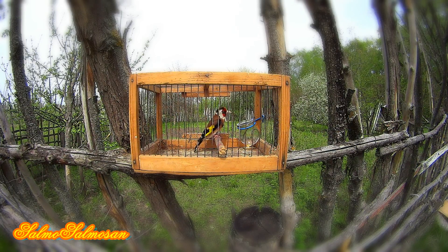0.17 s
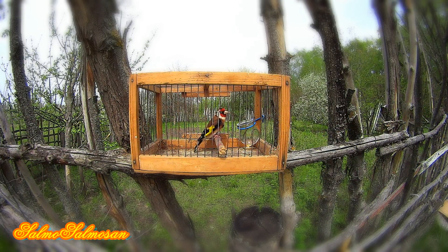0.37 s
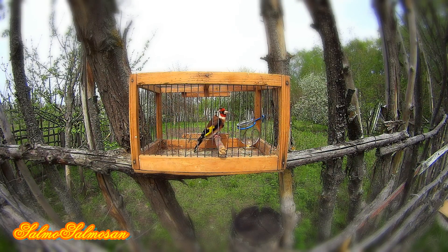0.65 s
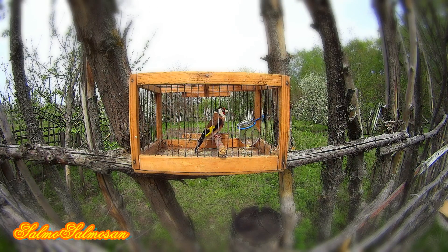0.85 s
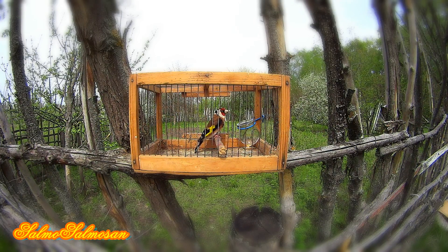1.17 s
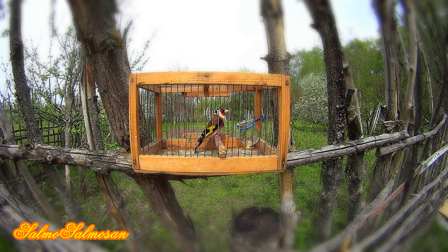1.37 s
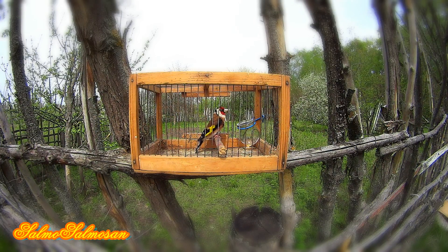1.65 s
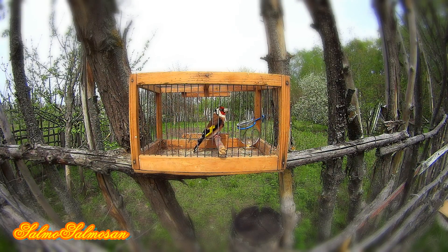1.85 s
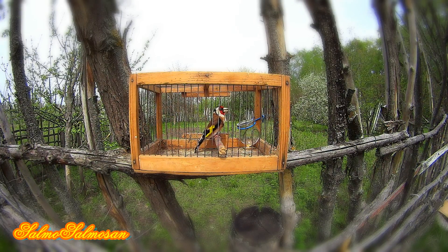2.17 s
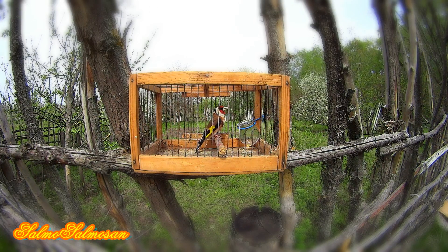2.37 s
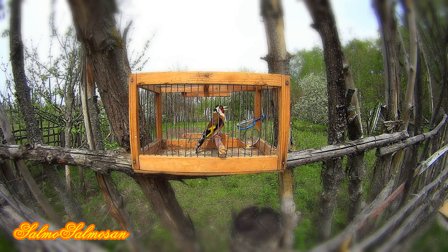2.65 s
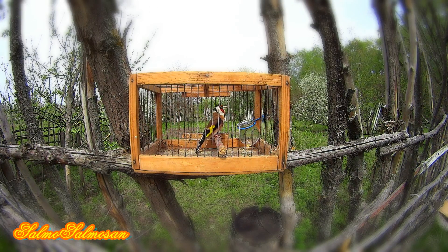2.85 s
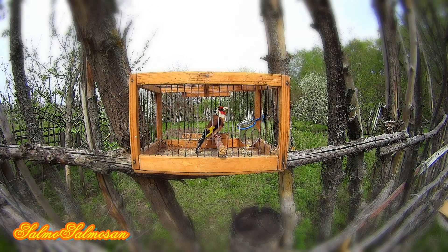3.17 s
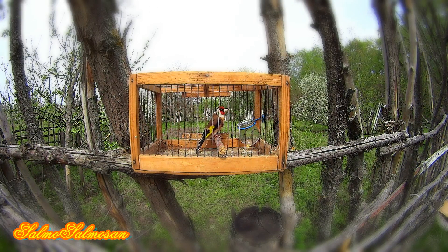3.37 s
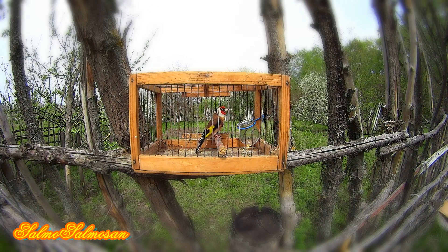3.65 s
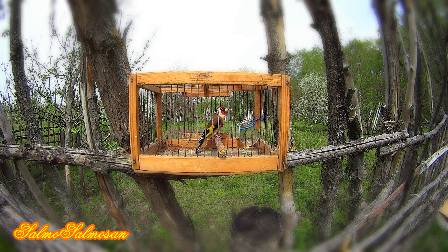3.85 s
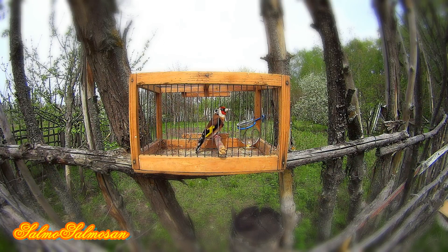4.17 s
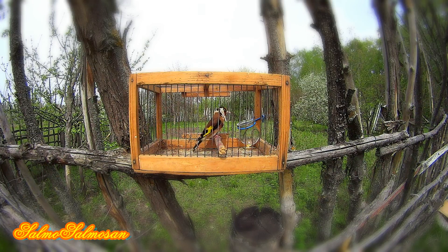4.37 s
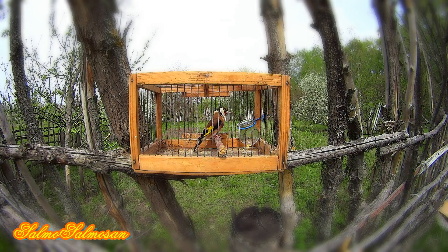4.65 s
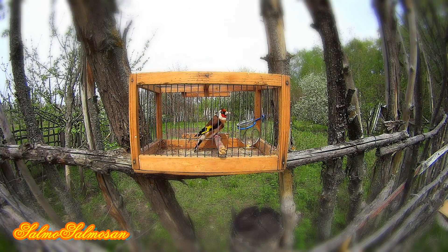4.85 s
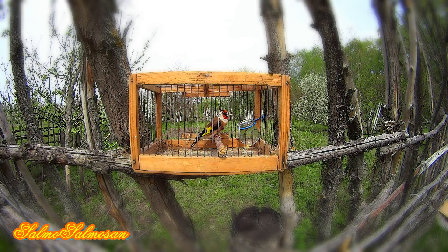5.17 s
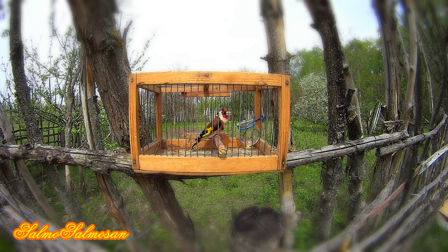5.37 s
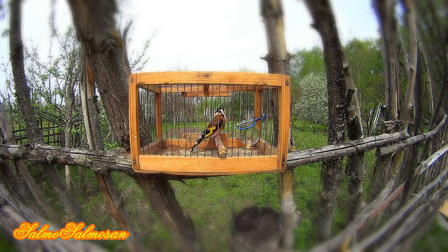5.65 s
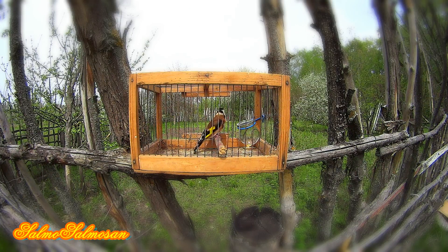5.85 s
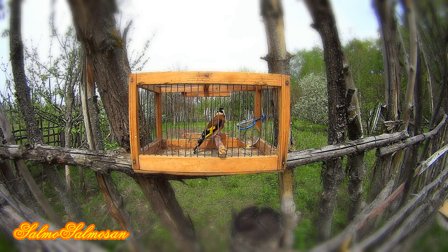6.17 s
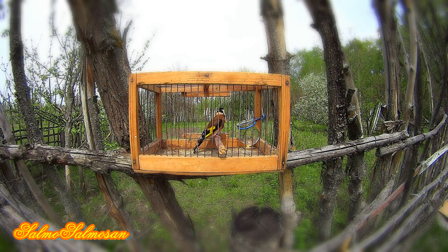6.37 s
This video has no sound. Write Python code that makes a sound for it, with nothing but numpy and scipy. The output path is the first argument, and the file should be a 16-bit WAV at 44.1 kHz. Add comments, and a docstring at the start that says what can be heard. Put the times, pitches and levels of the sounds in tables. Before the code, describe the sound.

In a quiet garden, a small caged goldfinch sings close to a stereo microphone. After a soft rushing pause come quick chirps, ringing high pings, a rising and falling raspy wheeze, then a dense rattling twitter. Another pause holds one barely audible far bird call, before a shorter second phrase of whipping notes, pings and a final wheeze. Foliage returns only a faint echo.

```python
"""A quiet garden: close to a stereo microphone, a goldfinch sings two twittering phrases.
Two sides of its voice organ (syrinx) whistle separately, mix into extra tones and turn raspy in the wheezes.
Trees return a faint echo, made by convolving the song with shaped noise.
Filtered noise makes a distant outdoor rush and a faint hum; a short noise band is another bird's far call."""
import sys
import numpy as np
from scipy import signal
from scipy.fft import rfft, irfft
from scipy.io import wavfile
from scipy.ndimage import uniform_filter1d

SR = 44100
rng = np.random.default_rng(int(sys.argv[2]) if len(sys.argv) > 2 else 0)


def unload_audio(sound):
    """Save the sound as a 16-bit wav file, at the path given as the first command line argument."""
    columns = np.transpose(np.atleast_2d(sound))
    # keep every value between -1 and 1, then stretch to whole-number steps
    steps = np.round(np.clip(columns, -1, 1) * 32767)
    wavfile.write(sys.argv[1], SR, steps.astype(np.int16))


N = 286650
T = np.arange(N) / SR  # time of each sample, seconds
FREQS = np.fft.rfftfreq(N, 1 / SR)  # hertz

# Tone colour of the distant rush, before its loudness is set: (pitch_hz, relative_level_db per Hz)
RUSH_SPECTRUM = [(12, -41.5), (20, -13.5), (64, -1), (131, -7), (162, -10.5), (298, -10.5), (340, -11.5),
                 (506, -9), (980, -8.5), (1280, -14), (1800, -18.5), (1950, -21.5), (3400, -26.5),
                 (10300, -32.5), (11200, -36.5), (14600, -69), (22000, -120)]
# Heard level of the background noise, before gain and flicker are added; it dips during each phrase
# of the song and comes back slowly: (time_s, level_db)
BACKGROUND_LEVEL = [(0, -50), (.7, -47), (1.6, -47.5), (2.1, -49.5), (2.7, -54), (3.6, -51), (4.1, -50),
                    (4.85, -47), (5.3, -52), (5.9, -51.5), (6.4, -48.5)]
# How the rush differs between the two microphone ports:
# (pitch_hz, coherence 0-1, left_lead_radians, left_minus_right_db)
RUSH_PORTS = [(59.17, 1, 0.2496, -0.5), (170, 0.97, .7, 0.5), (350, 0.64, 1.25, 0.2), (702, .82, 1.55, 2),
              (1400, 0.37, 1.7, 2), (3100, 0.64, 2.07, 3.1), (7100, 0.303, 1.4, -0.4)]
# The throat cannot tune down to the lowest notes and passes their overtones instead. Levels are relative
# to the main tone: (pitch_hz, second_harmonic_db, third_harmonic_db, fourth_harmonic_db)
OVERTONES = [(1600, 4.5, 6.5, -9), (2150, 11.5, -5, -5), (2740, -6, -28, -19.5), (2900, -17.5, -20, -35.5),
             (3480, -24, -26.5, -47.5), (4070, -33.5, -27, -50), (5168, -26, -26.5, -50),
             (5600, -46, -40, -49), (6840, -54, -50, -50)]
# What the throat and open beak let through of the mixed tones and the air: (pitch_hz, level_db)
THROAT = [(500, -61), (1300, -24), (2300, -9.5), (3400, 0.5), (6300, 0), (8500, -5), (10600, 2),
          (12300, -22), (15800, -17)]
# Each named syllable is a few strokes by the left or right side; the song rescales them:
# (side, delay_s, length_s, from_hz, to_hz, glide_s, glide_hesitation power, level_db,
#  attack_s, release_s, roughness 0-1)
SYLLABLES = { "tip": [("L", 0, .031, 1500, 2650, .009, 2.5, -20, .021, .011, .1)],
             "pip": [("L", 0, .029, 2380, 2770, .008, 2, -17, .017, .013, .08)],
             "twee": [("L", 0, .038, 2940, 3920, .014, 2.1, -4, .022, .014, .08),
             ("R", .028, .041, 2800, 5600, .0105, 1.6, -4.9, .014, .021, .08),
             ("L", .038, .031, 4450, 4830, .008, 1.1, -15, .02, .009, .08)],
             "chirp": [("L", 0, .022, 2650, 3000, .021, 4, -22, .015, .004, .55),
             ("R", .004, .04, 2950, 3500, .03, 2, -25, .02, .01, .15),
             ("L", .016, .034, 2950, 3360, .013, 1.4, -6.5, .019, .016, .08)],
             "churr": [("L", 0, .02, 2540, 3100, .018, 2.5, -20, .017, .003, .45),
             ("R", .014, .034, 3000, 4020, .013, 1.7, -7.8, .017, .01, .08),
             ("L", .018, .03, 2900, 3740, .011, 1.4, -11.5, .009, .009, .08)],
             "swee": [("R", .001, .011, 2900, 4250, .0045, 2, -6, .007, .003, .1),
             ("R", .007, .039, 4230, 5400, .029, 1.4, -6.7, .004, .007, .08),
             ("L", .012, .036, 4350, 5100, .018, 1.5, -17, .02, .005, .08),
             ("R", .043, .051, 5170, 5820, .033, 1.3, -6, .009, .013, .08),
             ("L", .048, .042, 5020, 4860, .008, 1.5, -16.5, .006, .012, .08)],
             "tsee": [("R", 0, .008, 5600, 5000, .004, 2, -8, .003, .002, .08),
             ("R", .006, .006, 5000, 8400, .0035, 1.5, -5.5, .002, .003, .08),
             ("L", .006, .058, 5050, 4150, .025, 1.4, -18.5, .015, .018, .13),
             ("R", .009, .021, 8000, 8720, .003, 1.5, -15, .005, .013, .25),
             ("R", .022, .046, 8550, 6880, .019, 1.6, -5, .03, .016, .08)],
             "chirrup": [("R", 0, .017, 3500, 5200, .007, 2, -9, .012, .003, .2),
             ("L", .001, .017, 3100, 4350, .008, 2, -11.5, .011, .004, .25),
             ("R", .014, .008, 4800, 3400, .004, 1.5, -5, .002, .002, .2),
             ("R", .021, .008, 4400, 3300, .004, 2, -5.5, .002, .003, .2),
             ("R", .027, .007, 3200, 4300, .003, 2, -11, .003, .003, .18),
             ("L", .029, .022, 3200, 2790, .005, 1.5, -17, .004, .018, .1)],
             "lift": [("L", 0, .016, 3650, 4620, .008, 1.6, -7.5, .009, .003, .1)],
             "whip": [("R", 0, .007, 4700, 8500, .004, 1.7, -5.5, .003, .003, .08),
             ("R", .005, .01, 8000, 8520, .002, 1.2, -17.5, .002, .008, .08)],
             "slide": [("L", 0, .07, 3340, 4400, .037, 1.6, -5.6, .024, .058, .08),
             ("R", .025, .046, 3950, 4580, .018, 1.4, -7, .01, .011, .08)], }
# The order of the song: (start_s, syllable name, time_stretch ratio, pitch ratio, gain_db)
SONG = [ (1.622, "tip", 1.01, 1.001, -1), (1.702, "twee", 1.01, 1.002, 0), (1.801, "chirp", 1.01, .998, 0),
        (2.475, "churr", 1.01, .998, 0), (2.546, "pip", 1.01, .998, 0), (2.596, "swee", 1.001, .999, 0),
        (2.723, "churr", .97, 1.002, 0), (2.796, "pip", 1.01, 1.005, -1), (2.851, "swee", 1.02, 1.001, 0),
        (2.992, "churr", 1.01, .999, 0), (3.075, "tsee", 1.001, 1.001, 0),
        (3.15, "chirrup", 1.01, 1.001, 0), (3.246, "tsee", .98, .998, 0),
        (3.323, "chirrup", .98, .995, -1.5), (4.896, "tip", .99, 1.002, 2.5),
        (4.974, "twee", 1.01, .995, 0), (5.075, "chirp", .99, 1.002, -1), (5.156, "lift", 1.01, 1.001, -1),
        (5.17, "whip", 1.01, 1.001, 0), (5.207, "slide", 1.001, 1.001, 0), (5.319, "lift", .9, 1.11, 0),
        (5.331, "whip", 1.01, .998, 0), (5.369, "slide", .97, .996, 0), ]
# Ringing pings of two voices, the first with a faint lower third, one row per voice:
# (start_s, side, length_s, pitch_hz, settling_s, level_db, attack_s, release_s)
PINGS = [ (1.897, "L", .045, 6190, .013, -13, .003, .007), (1.902, "R", .039, 7440, .011, -7.6, .004, .009),
         (1.905, "L", .031, 3740, .012, -30, .007, .022), (2.007, "L", .055, 5180, .009, -5.3, .021, .008),
         (2.008, "R", .028, 6370, .004, -10, .004, .018), (5.465, "L", .053, 6755, .006, -7, .004, .008),
         (5.471, "R", .046, 7830, .016, -15, .007, .004), (5.557, "L", .049, 5650, .006, -5.5, .018, .008),
         (5.555, "R", .022, 7050, .006, -7.5, .003, .018), ]
# In each wheeze the right side climbs, then slurs down; all four curves have the same columns,
# with levels before the peak boost and fades: (time_s, pitch_hz, rms_level_db)
FIRST_CLIMB = [(2.117, 4295, -36), (2.125, 4296, -22), (2.149, 4541, -18), (2.175, 5005, -11),
               (2.195, 5297, -14), (2.203, 5581, -19), (2.231, 6874, -17), (2.25, 7261, -17)]
FIRST_SLUR = [(2.268, 6317, -16), (2.312, 5843, -12), (2.346, 5120, -9), (2.358, 4711, -8),
              (2.374, 4124, -10), (2.404, 3358, -11), (2.42, 2753, -23), (2.428, 2731, -37)]
SECOND_CLIMB = [(5.667, 4663, -38), (5.677, 4738, -23), (5.689, 4966, -23), (5.721, 5370, -15),
                (5.751, 5876, -23), (5.771, 6378, -13), (5.783, 6760, -19)]
SECOND_SLUR = [(5.818, 6806, -15), (5.856, 6982, -13), (5.87, 6590, -11), (5.876, 6253, -9),
               (5.92, 4185, -10), (5.94, 3427, -20), (5.952, 2978, -30), (5.958, 2894, -43)]
# Strokes that accompany the wheezes and make them harsh:
# (side, start_s, length_s, from_hz, to_hz, glide_s, glide_hesitation power, level_db,
#  attack_s, release_s, roughness 0-1)
WHEEZE_STROKES = [ ("L", 2.119, .083, 1450, 3000, .078, 1.8, -31, .008, .015, .55),
                  ("L", 2.13, .078, 3050, 5600, .062, 1.7, -20, .03, .02, .55),
                  ("L", 2.198, .038, 3080, 3700, .025, 1.5, -19, .028, .005, .65),
                  ("L", 2.229, .029, 3750, 4600, .022, 1.6, -7.5, .012, .007, .29),
                  ("L", 2.25, .03, 3150, 3430, .008, 2, -9, .014, .014, .29),
                  ("L", 2.29, .072, 4430, 2900, .052, 1.6, -13.5, .007, .03, .08),
                  ("R", 2.305, .047, 8400, 6600, .033, 1.3, -24, .014, .016, .08),
                  ("L", 2.355, .062, 3200, 1700, .042, 1.3, -29, .005, .05, .16),
                  ("L", 5.668, .095, 1500, 3200, .08, 1.2, -31, .01, .04, .7),
                  ("L", 5.674, .08, 3450, 5800, .066, 2.4, -21, .04, .03, .7),
                  ("L", 5.754, .056, 3350, 5400, .033, 1.2, -16, .038, .01, .12),
                  ("L", 5.775, .032, 3265, 3750, .018, 1.3, -20.5, .012, .004, .12),
                  ("R", 5.774, .032, 5300, 6300, .02, 1.4, -20, .01, .016, .12),
                  ("L", 5.802, .024, 3650, 3900, .012, 1.5, -9, .012, .011, .12),
                  ("L", 5.846, .054, 4470, 3000, .045, 2.2, -20, .008, .015, .08),
                  ("L", 5.897, .052, 3350, 1700, .04, 1.5, -31, .005, .006, .21), ]
# The song at the two microphone ports: (pitch_hz, left_lead_radians, left_minus_right_db)
PORTS = [(2800, 0.85, 0), (4042, 0.27, 0.3), (6000, 0.334, -0.9), (9020, 0.27, -1.4), (14000, 1.6, -.7)]
# Scattered echoes off trunks and fence, before their treble is softened: (delay_s, level_db)
ECHOES = [(0.022, -25.5), (.052, -38)]

NOISE_TOP_HZ, TOP_HZ = 11200, 16100  # where the background noise and the whole sound are cut off
GARDEN_T60_S, GARDEN_DB = 0.45, -33.5  # foliage: time to fade by 60 dB, level before treble softening
# The rasp: average flutter rate of the membranes (Hz), and its swings at full roughness:
# regular phase swing (radians), random phase swing (radians rms), swing of strength (share)
FLUTTER_HZ, FLUTTER_SWING, FLUTTER_CHANCE, FLUTTER_DEPTH = 558.5, 1.4, 0.67, 0.68
PING_SHARP = 1.08  # a ping starts sharp by this ratio and settles on its pitch
RAMP_POWER = 1.5  # how softly every stroke opens and closes: power of a quarter sine
WHEEZE_FADE_S, WHEEZE_PEAK_DB = 0.007, 2.2  # fade at each end, peak over rms level


def undb(db):
    """Turn decibels into gain."""
    return 10 ** (np.asarray(db) / 20)


def along(points, hz, axis=1):
    """Read a table column, joined by straight lines over a log-frequency axis."""
    points = np.array(points, float)
    return np.interp(np.log(hz + 1), np.log(points[:, 0] + 1), points[:, axis])


def noise(centre_hz, width_hz):
    """Make a bell-shaped band of noise with an rms of 1; around 0 Hz it is a slow random drift."""
    bell = np.exp(-.5 * ((FREQS - centre_hz) / width_hz) ** 2)
    band = irfft(rfft(rng.standard_normal(N)) * bell, N)
    return band / band.std()


def smooth(x, seconds):
    """Take a running mean: muscles cannot turn sharp corners."""
    return uniform_filter1d(x, max(1, int(seconds * SR)))


def rush(gain_db=3, flicker_db=.5):
    """Distant outdoor noise, partly shared by the ports and arriving mostly from one side."""
    shared, own = rfft(rng.standard_normal((2, N)))
    coherence = np.clip(along(RUSH_PORTS, FREQS, axis=1), 0, 1)
    left = np.sqrt(coherence) * shared + np.sqrt(1 - coherence) * own
    left = left * np.exp(1j * along(RUSH_PORTS, FREQS, axis=2))
    tilt = undb(along(RUSH_PORTS, FREQS, axis=3) / 2)
    colour = undb(along(RUSH_SPECTRUM, FREQS)) * (FREQS < NOISE_TOP_HZ)
    stereo = irfft(np.array([left * tilt, shared / tilt]) * colour, N)
    level_db = np.interp(T, *np.transpose(BACKGROUND_LEVEL)) + gain_db + flicker_db * noise(0, 9.2)
    return stereo / stereo.mean(axis=0).std() * undb(level_db)


def hum(hz=297, width_hz=5, db=-66):
    """A faint distant hum: a noise band so narrow that it wavers like an unsteady tone."""
    return undb(db) * noise(hz, width_hz)


def strokes():
    """List every stroke at its own time: sung syllables, pings and wheeze strokes."""
    sung = []
    for at, name, stretch, ratio, gain_db in SONG:
        for (side, delay, length, start_hz, end_hz, glide, hesitation,
             db, attack, release, rough) in SYLLABLES[name]:
            sung.append((side, at + stretch * delay, stretch * length,
                         ratio * start_hz, ratio * end_hz, stretch * glide, hesitation,
                         db + gain_db, stretch * attack, stretch * release, rough))
    pings = [(side, at, length, PING_SHARP * hz, hz, settling, 1, db, attack, release, 0)
             for at, side, length, hz, settling, db, attack, release in PINGS]
    return sung + pings + WHEEZE_STROKES


def ramps_db(t, attack, release):
    """The air opens, holds and closes over the times t of one note."""
    opening = np.sin(np.pi / 2 * np.clip((t - t[0]) / attack, 0, 1))
    closing = np.sin(np.pi / 2 * np.clip((t[-1] - t) / release, 0, 1))
    return RAMP_POWER * 20 * np.log10(np.maximum(opening * closing, 1e-3))


def stroke(at, length, start_hz, end_hz, glide, hesitation, db, attack, release, size=200):
    """One note as rows (s, Hz, dB): the membrane's tension relaxes towards a new pitch."""
    t = np.linspace(0, length, size)
    hz = end_hz + (start_hz - end_hz) * np.exp(-(t / glide) ** hesitation)
    return np.column_stack([at + t, hz, db + ramps_db(t, attack, release)])


def slur(curve, size=200):
    """One long wheeze note as rows (s, Hz, dB), steered freely in pitch and strength."""
    s, hz, db = np.transpose(curve)
    t = np.linspace(s[0], s[-1], size)
    level_db = np.interp(t, s, db) + WHEEZE_PEAK_DB + ramps_db(t, WHEEZE_FADE_S, WHEEZE_FADE_S)
    return np.column_stack([t, np.interp(t, s, hz), level_db])


def notes_of(side):
    """Put one side's notes in order; the right side also carries the wheeze climbs and slurs."""
    notes = [stroke(*shape) for own, *shape, _ in strokes() if own == side]
    if side == "R":
        notes += [slur(curve) for curve in (FIRST_CLIMB, FIRST_SLUR, SECOND_CLIMB, SECOND_SLUR)]
    return sorted(notes, key=lambda note: note[0, 0])


def roughness(calm=0.073):
    """How irregularly the membranes vibrate at each moment: the harshest stroke decides."""
    rough = np.full(N, calm)
    for _, at, length, *_, amount in strokes():
        span = slice(int(at * SR), int((at + length) * SR))
        rough[span] = np.maximum(rough[span], np.clip(amount, 0, 1))
    return smooth(rough, 0.0054)


def membrane(notes, rough, flutter, waver=0.0033):
    """One vibrating mode's pitch, strength and phase, shaken by flutter where it is rough."""
    hz, size = np.full(N, 3000.), np.zeros(N)
    for note in notes:
        s, pitch, db = np.transpose(note)
        s = np.maximum.accumulate(s)
        span = slice(int((s[0] - .002) * SR), int((s[-1] + .002) * SR))
        hz[span] = np.interp(T[span], s, pitch)
        size[span] = np.interp(T[span], s, undb(db), left=0, right=0)
    hz = smooth(hz, 0.0023) * (1 + waver * noise(0, 120))
    shake = FLUTTER_SWING * np.sin(flutter) + FLUTTER_CHANCE * noise(400, 485)
    # adding up the pitch gives the phase of the vibration
    phase = 2 * np.pi * np.cumsum(hz) / SR + rough * shake
    size = smooth(size, .0012) * (1 + FLUTTER_DEPTH * rough * np.sin(flutter))
    return hz, size, phase


def modes_of(side, rough, flutter, count=3):
    """Notes take turns on a few modes of one membrane, so that neighbours can overlap."""
    notes = notes_of(side)
    return [membrane(notes[k::count], rough, flutter) for k in range(count)]


def whistle(hz, size, phase):
    """A nearly pure tone with the overtones that the throat lets through."""
    tone = np.sin(phase)
    for k in range(2, 5):
        overtone = undb(along(OVERTONES, hz, axis=k - 1)) * np.sin(k * phase)
        tone += overtone * (k * hz < .45 * SR)  # leave out overtones too high for the sample rate
    return size * tone


def combination_tones(left, right, upper_db=0, lower_db=-8, sum_db=-7, difference_db=0):
    """Two voices multiplied in one windpipe make new tones at sums and differences of their pitches."""
    upper = undb(upper_db) * right ** 2 * left.conj()  # twice the right pitch minus the left
    lower = undb(lower_db) * left ** 2 * right.conj()  # twice the left pitch minus the right
    total = undb(sum_db) * left * right
    difference = undb(difference_db) * right * left.conj()
    return -(upper + lower + total + difference).imag


def breath(left, right, rough, flutter, air_db=-36, rasp_air_db=-16, attack_air_s=0.00037):
    """Turbulent air escapes in puffs, once per flutter, and spurts as each note opens."""
    effort = np.hypot(abs(left), abs(right))
    puffs = undb(air_db) + rough * undb(rasp_air_db) * (1 + np.sin(flutter))
    opening_speed = np.gradient(smooth(effort, 0.0022), 1 / SR)
    spurts = attack_air_s * np.maximum(opening_speed, 0)
    return (effort * puffs + spurts) * rng.standard_normal(N)


def goldfinch(left_share=0.41):
    """Both sides sing into one windpipe; the throat shapes their combination tones and turbulent air."""
    rough = roughness()
    unsteady = .19 * noise(0, 130)
    flutter = 2 * np.pi * np.cumsum(FLUTTER_HZ * (1 + unsteady)) / SR
    lefts = modes_of("L", left_share * rough, flutter)  # the left side gets a smaller share of the rasp
    rights = modes_of("R", rough, flutter)
    song = sum(whistle(*voice) for voice in lefts + rights)
    # complex numbers hold strength and phase together
    left = sum(size * np.exp(1j * phase) for _, size, phase in lefts)
    right = sum(size * np.exp(1j * phase) for _, size, phase in rights)
    extra = combination_tones(left, right) + breath(left, right, rough, flutter)
    return song + irfft(rfft(extra) * undb(along(THROAT, FREQS)), N)


def garden(song, echo_spread_s=.006):
    """The direct song at two ports, plus two blurred echoes and a short scatter from the foliage."""
    t = T[:SR // 2]
    foliage = undb(-60 * t / GARDEN_T60_S) * (t > .002)
    shapes = [(foliage, GARDEN_DB)]
    shapes += [(np.exp(-.5 * ((t - delay) / echo_spread_s) ** 2), db) for delay, db in ECHOES]
    power = sum((shape * undb(db)) ** 2 / np.sum(shape ** 2) for shape, db in shapes)
    scatter = rng.standard_normal((2, len(t))) * np.sqrt(power)
    soften = signal.butter(2, 8000, fs=SR, output="sos")
    response = signal.sosfilt(soften, scatter)
    # each port gets half of the level and phase difference, in opposite directions
    lean = undb(along(PORTS, FREQS, axis=2) / 2) * np.exp(.5j * along(PORTS, FREQS, axis=1))
    direct = irfft(rfft(song) * np.array([lean, 1 / lean]), N)
    return direct + signal.fftconvolve(song[None], response, axes=1)[:, :N]


def far_bird():
    """One distant call: a brief swell of narrow noise, blurred by the trees and separate on each side."""
    at_s, spread_s, hz, width_hz, db = 4.135, .028, 2620, 200, -56.5
    swell = np.exp(-.5 * ((T - at_s) / spread_s) ** 2)
    return undb(db) * swell * np.array([noise(hz, width_hz), noise(hz, width_hz)])


def scene():
    """The rush and hum, the singer in its garden, and the far bird sound together."""
    return rush() + hum() + garden(goldfinch()) + far_bird()


def record(dry):
    """The recorder cuts the top with a steep low-pass filter."""
    return signal.sosfiltfilt(signal.ellip(8, .1, 60, TOP_HZ, fs=SR, output="sos"), dry)


dry = scene()
out = record(dry)
unload_audio(out)
```